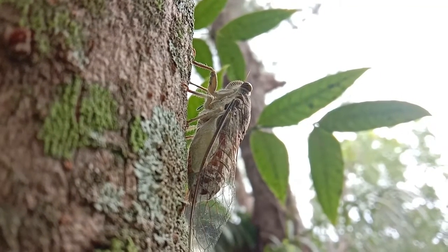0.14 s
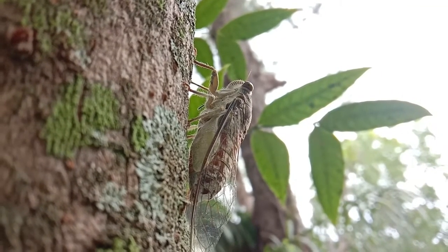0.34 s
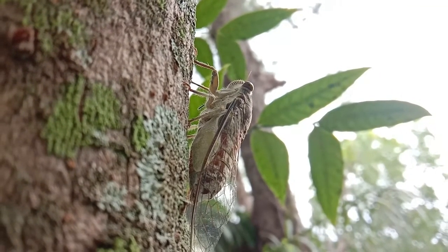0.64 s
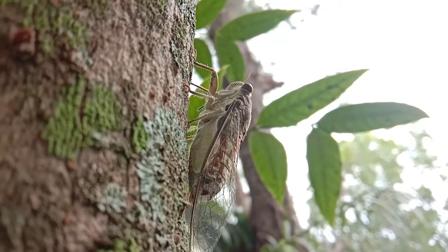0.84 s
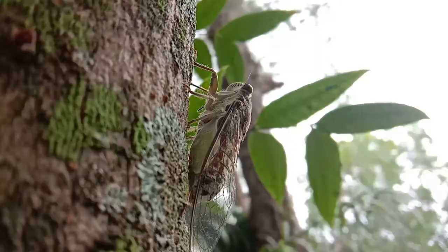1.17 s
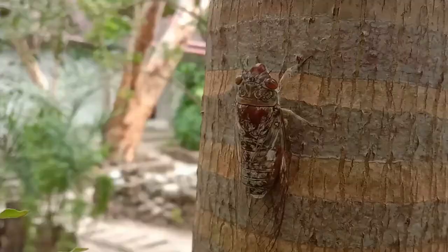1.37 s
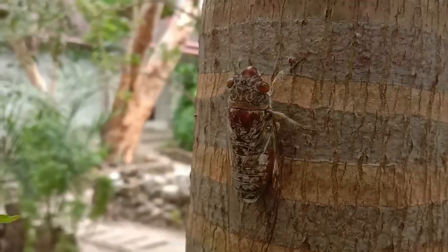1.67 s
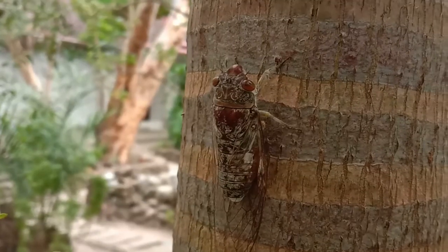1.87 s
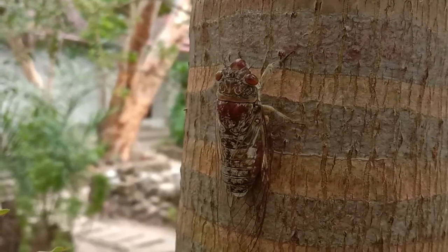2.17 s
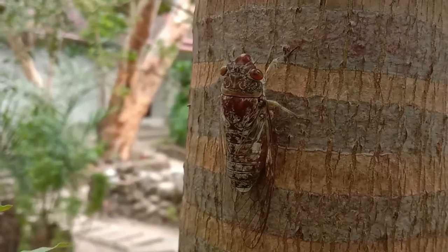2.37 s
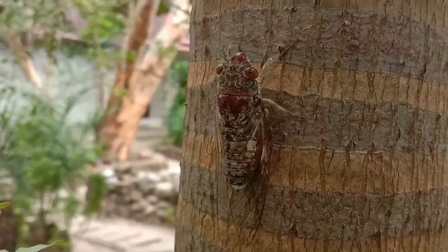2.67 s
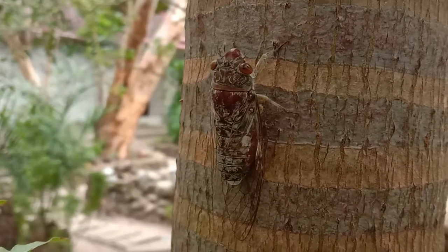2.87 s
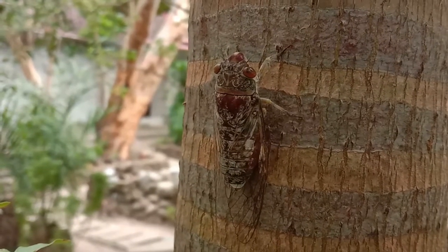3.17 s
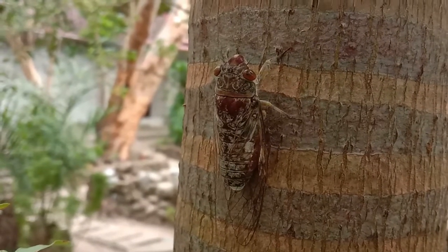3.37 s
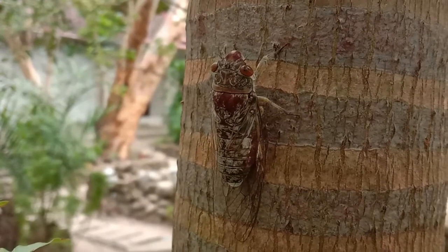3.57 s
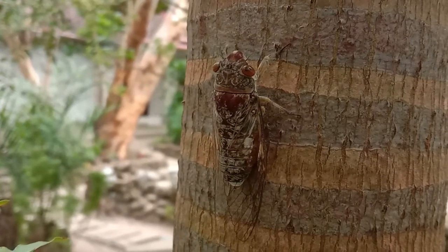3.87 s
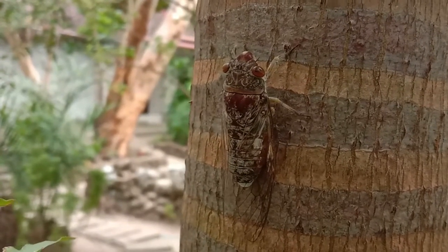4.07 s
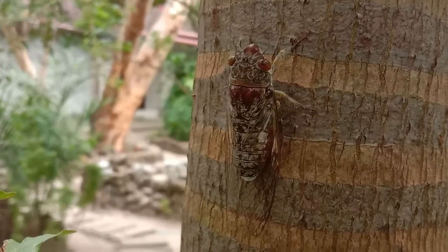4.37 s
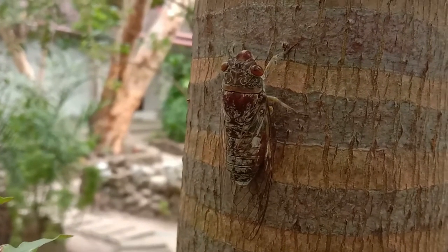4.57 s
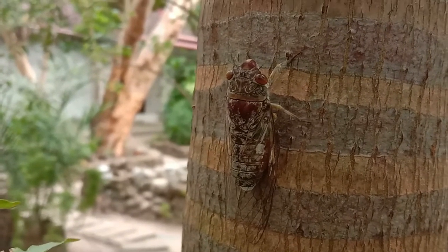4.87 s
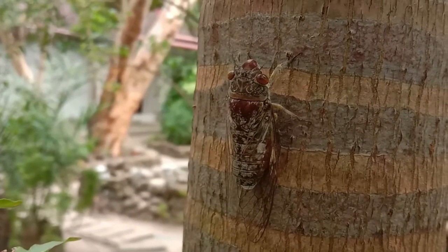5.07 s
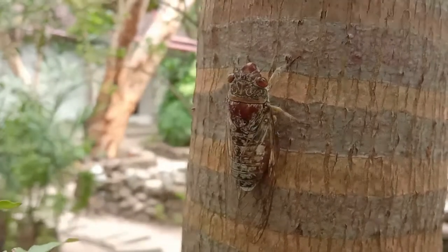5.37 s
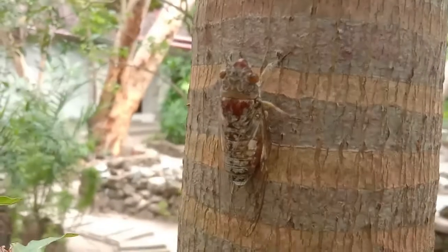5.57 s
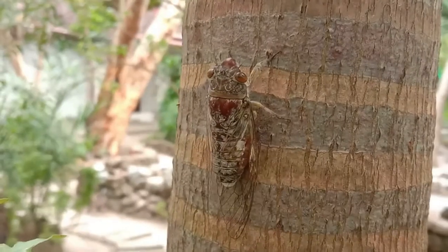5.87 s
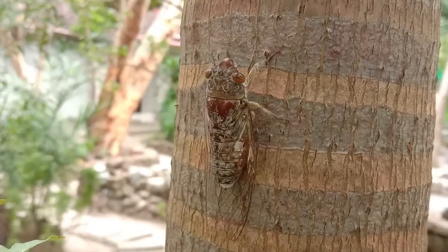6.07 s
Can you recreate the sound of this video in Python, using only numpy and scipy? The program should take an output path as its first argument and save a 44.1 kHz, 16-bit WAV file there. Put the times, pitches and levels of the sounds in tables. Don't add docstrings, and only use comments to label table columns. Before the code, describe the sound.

Harsh, dense cicada buzzing outdoors, broken by a brief silent gap, then resuming with a sharper sizzle over faint distant insect drone and chirps.

```python
import sys
import numpy as np
from scipy import signal
from scipy.fft import rfft, irfft
from scipy.io import wavfile
from scipy.ndimage import uniform_filter1d

SR = 44100
rng = np.random.default_rng(int(sys.argv[2]) if len(sys.argv) > 2 else 0)


def waveform_to_disk(signal):
    frames = np.transpose(np.atleast_2d(signal))
    scaled = np.clip(frames, -1, 1) * 32767
    samples = np.round(scaled).astype(np.int16)
    wavfile.write(sys.argv[1], SR, samples)


def magnitude_from_level(level_db):
    exponent = np.asarray(level_db, float) / 20
    return 10 ** exponent


N = 275184
TIME = np.arange(N) / SR
CUT_S = 1.3


def by_shot(first, second):
    return np.where(TIME < CUT_S, first, second)


def rms_one(x):
    return x / np.sqrt(np.mean(x ** 2) + 1e-20)


def drift(rate_hz):
    r = np.exp(-80 * np.pi * rate_hz / SR)
    settle = 2000
    noise = rng.standard_normal(N // 40 + 2 + settle)
    slow = signal.lfilter([1], [1, -2 * r, r * r], noise)[settle:]
    return np.interp(np.arange(N) / 40, np.arange(len(slow)), rms_one(slow))


def resonate(x, hz, width_hz):
    r = np.exp(-np.pi * width_hz / SR)
    b = (1 - r * r) / 2 * np.array([1, 0, -1])
    a = [1, -2 * r * np.cos(2 * np.pi * hz / SR), r * r]
    return signal.lfilter(b, a, signal.lfilter(b, a, x))


def bump(at_s, half_s):
    out = np.zeros(N)
    span = slice(max(int((at_s - half_s) * SR), 0), int((at_s + half_s) * SR) + 1)
    out[span] = np.cos(np.pi / 2 * np.clip((TIME[span] - at_s) / half_s, -1, 1)) ** 2
    return out


# (frequency [Hz], width [Hz], level [dB])
AIR_SAC = [
    [(500, 40, -27.5), (660, 170, -29), (958, 286, -15), (1750, 430, -1.5)],
    [(1408, 380, -16.5), (1749, 367, -0.5)],
]
# (frequency [Hz], width [Hz], level [dB])
TYMBAL = [
    [(2425, 690, -21), (3457, 720, 2), (4130, 730, -5)],
    [(2440, 500, -38), (3548, 713, 5), (4220, 590, -1)],
]
# (frequency [Hz], width [Hz], level [dB])
RIBS = [
    [(5300, 1600, -3), (5900, 1200, -6.5), (7070, 950, -7)],
    [(5243, 1010, -0.5), (6026, 910, -0.5), (6910, 1114, -4.5)],
]
# (frequency [Hz], width [Hz], level [dB])
RASP = [
    [(8500, 2440, -14), (11500, 6000, -7), (14600, 700, 1), (15400, 1600, 5)],
    [(8500, 2900, -5.5), (11900, 5800, -8), (14300, 450, -5), (14700, 600, 1), (15250, 800, .5)],
]
LOW_CUT_HZ = [392, 1115]


def cicada():
    # modes, clicks per second, flicker [dB], flicker rate [Hz], muscle beat [dB]
    parts = [(AIR_SAC, 24000, 0.3, 11, 0.1),
             (TYMBAL, 30000, 0.3, 12, 0.2),
             (RIBS, 32000, 0.3, 13, 0.4),
             (RASP, 24000, 0.3, 5, 1.4)]
    shots = [TIME < CUT_S, TIME >= CUT_S]
    beats = drift(300)
    out = np.zeros(N)
    for (modes, per_s, flicker_db, flicker_hz, beat_db), level_db in zip(parts, part_levels()):
        both = [body_part(shot_modes, cut_hz, shot, per_s, flicker_db, flicker_hz)
                for shot_modes, cut_hz, shot in zip(modes, LOW_CUT_HZ, shots)]
        out += magnitude_from_level(level_db + beat_db * beats) * np.concatenate(both)
    return out


def body_part(modes, cut_hz, shot, per_s, flicker_db, flicker_hz):
    together = drift(flicker_hz)[shot]
    rung = 0
    for hz, width_hz, db in modes:
        alone = drift(1.2 * flicker_hz)[shot]
        swell = magnitude_from_level(db + flicker_db * (together + 0.6 * alone))
        rung = rung + swell * resonate(clicks(len(together), per_s), hz, width_hz)
    low_cut = signal.cheby2(8, 45, 0.808 * cut_hz, "high", fs=SR, output="sos")
    return rms_one(signal.sosfilt(low_cut, rung))


def clicks(count, per_s):
    return rng.standard_normal(count) * (rng.random(count) < per_s / SR)


# (time [s], effort [dB], brightness [dB])
EFFORT = [(0, 0.5, 0.5), (.3, 0.5, -0.5), (.65, 0, 0), (.9, 0.5, 0), (1.08, -.5, 0.5), (1.17, 2, 0),
          (1.5, -1, -0.5), (1.95, 0, 0), (2.45, -0.5, -1), (3.0, 0.5, -.5), (3.5, 0, -.5), (3.9, 0, 0.5),
          (4.15, -.5, 0.5), (4.7, 0.5, 0.5), (5.3, 0, 1.5), (5.7, .5, .5), (6.05, 0, 0), (6.24, .5, 1.5)]
# (first shot [dB], second shot [dB], share of brightness [ratio], throb [dB])
PARTS = [
    (-34.5, -37, 0.0, -0.14),
    (-25, -23, -0.94, -0.64),
    (-22.5, -18.5, .45, 0.45),
    (-35.5, -36, 1.1, 2.5),
]
# (time [s], level [dB])
SLACKS = [
    (4.08, -2.5),
    (4.3, -3.5),
    (4.53, -2.5),
    (4.76, -4),
    (5.0, -1.5),
    (5.81, -2.5),
    (5.98, -2),
]


def part_levels():
    s, effort, bright = np.transpose(EFFORT)
    effort_db, bright_db = np.interp(TIME, s, effort), np.interp(TIME, s, bright)
    pumping = throb()
    levels = [by_shot(first_db, second_db) + effort_db + share * bright_db + throb_db * pumping
              for first_db, second_db, share, throb_db in PARTS]
    tymbal = 1
    levels[tymbal] = levels[tymbal] + sum(db * bump(s, half_s=0.053) for s, db in SLACKS)
    return levels


# (time [s], strength [ratio])
PUMPS = [(.06, 0.56), (.25, 0.85), (.43, 1.1), (.62, 1.2), (.8, 1.3), (.96, .5), (1.1, 0.55), (1.94, 0.84),
         (2.07, 0.54), (2.21, 0.69), (2.45, .5), (2.62, 0.65), (2.78, 0.55), (3.08, 0.56), (3.26, 0.65),
         (3.55, 1.1), (3.83, .8), (4.06, 1.4), (4.22, 0.61), (4.39, .8), (4.55, 1.4), (4.74, 0.98),
         (4.97, 1.2), (5.19, 1), (5.38, 0.56), (5.62, 0.92), (5.81, .8), (5.98, 1.8), (6.19, .8)]


def throb():
    return sum(strength * bump(s, half_s=0.058) for s, strength in PUMPS)


# (time [s], half length [s], level [dB])
DRONE_SWELLS = [(0.694, 0.031, -52), (1.64, 0.069, -49), (1.793, 0.23, -50), (2.716, 0.057, -61),
                (2.992, 0.073, -57), (3.363, 0.35, -55.5), (4.11, 0.45, -51.5), (4.604, 0.8, -57),
                (5.247, 0.26, -54.5), (5.716, 0.27, -58), (6.054, .3, -60)]


def far_drone():
    level = magnitude_from_level(by_shot(-46, -63) - 0.3 * drift(2.9))
    level = level + sum(magnitude_from_level(db) * bump(s, half_s) for s, half_s, db in DRONE_SWELLS)
    return level * rms_one(resonate(rng.standard_normal(N), hz=1245, width_hz=70))


# (frequency [Hz], level [dB per Hz])
WOOD_COLOUR = [(15, -51), (25, -25), (32, -2.5), (107, 1.5), (269, -6.5), (446, -6.5), (642, -7.5),
               (954, -4.5), (1100, -16), (1430, -35), (2420, -120)]


def wood():
    hz = np.arange(N // 2 + 1) * SR / N + 1
    table_hz, table_db = np.transpose(WOOD_COLOUR)
    colour = magnitude_from_level(np.interp(np.log(hz), np.log(table_hz), table_db))
    rumble = irfft(rfft(rng.standard_normal(N)) * colour, N)
    lumpy = rumble * magnitude_from_level(1.1 * drift(16))
    gusts_db = 0.4 * drift(3.3)
    return magnitude_from_level(by_shot(-68, -70.5) + gusts_db) * rms_one(lumpy)


# (time [s], frequency [Hz],
# width [Hz], half length [s], level [dB])
CHIRPS = [(0.777, 79.6, 30, 0.17, -70), (1.97, 230, 80, .04, -69.5), (3.914, 110, 80, 0.076, -66),
          (4.366, 140, 120, .04, -69), (4.46, 180, 150, .03, -67), (4.578, 130, 120, 0.042, -62),
          (6.008, 120, 120, .06, -65), (2.38, 1010, 80, .04, -70), (1.978, 1100, 150, 0.12, -57),
          (3.92, 477, 60, 0.046, -64), (4.0, 440, 60, .06, -70), (4.057, 840, 200, 0.055, -66),
          (4.343, 1050, 120, 0.058, -60), (4.714, 400, 300, .06, -71), (5.283, 1104, 150, 0.053, -56),
          (5.294, 750, 200, 0.046, -67), (5.82, 450, 300, 0.036, -72), (5.983, 500, 500, .04, -67),
          (0.001, 356, 900, 0.0055, -42), (6.239, 300, 900, 0.0033, -41)]


def far_chirps():
    noise = rng.standard_normal(N)
    return sum(magnitude_from_level(db) * bump(s, half_s) * rms_one(resonate(noise, hz, width_hz))
               for s, hz, width_hz, half_s, db in CHIRPS)


def scene():
    return np.tile(cicada() + far_drone() + wood() + far_chirps(), (2, 1))


def suppress(x, contrast, mute, size):
    hz, s, cells = signal.stft(x, SR, nperseg=size, noverlap=size // 2, window="cosine", boundary="even")
    height = np.abs(cells) + 1e-12
    around = uniform_filter1d(uniform_filter1d(height, size=9, axis=0), size=5, axis=1)
    relief = height / around
    patch = uniform_filter1d(uniform_filter1d(relief, size=3, axis=0), size=3, axis=1)
    under_buzz = ((hz > 450) & (hz < 1190)) * np.clip(hz / 1050, 0, 1) ** 1.2
    masked = under_buzz[:, None] * (s > CUT_S)
    gain = relief ** contrast * np.where(patch < mute * masked, magnitude_from_level(-30), 1)
    return signal.istft(cells * gain, nperseg=size, noverlap=size // 2, window="cosine")[1][:N]


THIN_MOMENTS = (.689, 1.67, 2.823, 2.928, 3.014, 3.292, 4.315, 4.508, 5.765)


def thin_out(x, count):
    out = x.copy()
    half_s, rest_db = 0.016, -15
    for s in THIN_MOMENTS:
        span = slice(round((s - half_s) * SR), round((s + half_s) * SR))
        lines = rfft(x[span])
        hz = np.arange(len(lines)) * SR / len(x[span])
        rank = np.abs(lines) * magnitude_from_level(10 * (hz > 14400) + 7.5 * (hz < 2000))
        strongest = rank >= np.sort(rank)[-count]
        kept = irfft(lines * strongest, len(x[span]))
        out[span] += bump(s, half_s)[span] * (magnitude_from_level(2.0) * kept - (1 - magnitude_from_level(rest_db)) * x[span])
    return out


# (low [Hz], high [Hz], lines kept [count], from time [s])
STALL_BANDS = [
    (1700, 1790, 1, .615),
    (3050, 3800, 4, 0),
    (4980, 5850, 5, 0),
    (6050, 6350, 1, 0),
    (6830, 7230, 1, 0),
    (14900, 15500, 3, 0),
]


def stall(x):
    start_s, end_s, step_s = 0.582, 0.648, 0.0215
    to_edge_s = np.minimum(TIME - start_s + 0.013, end_s + 0.013 - TIME)
    inside = np.sin(np.pi / 2 * np.clip(to_edge_s / 0.017, 0, 1)) ** 2
    out = (1 - inside) * x
    for middle_s in start_s + step_s * np.arange(4):
        window = bump(middle_s, step_s)
        near = window > 0
        height = 2 * np.abs(rfft((x * window)[near])) / window.sum()
        hz = np.arange(len(height)) * SR / near.sum()
        peaks = signal.find_peaks(height, distance=4)[0]
        for low_hz, high_hz, count, since_s in STALL_BANDS:
            inband = peaks[(hz[peaks] > low_hz) & (hz[peaks] < high_hz) & (middle_s > since_s)]
            kept = inband[np.argsort(height[inband])[-count:]]
            turns = np.outer(hz[kept], TIME[near]) + rng.random((count, 1))[:len(kept)]
            tones = height[kept] @ np.sin(2 * np.pi * turns)
            out[near] += magnitude_from_level(4.5) * tones * window[near] ** 0.42
    return out


def edit():
    out_s, tail_s, entry_s, rise_s = 1.1953, 0.021, 1.42, 0.049
    closing = np.cos(np.pi / 2 * np.clip((TIME - out_s) / tail_s, 0, 1)) ** 0.76
    tail = magnitude_from_level(-20.5) * closing * (TIME < out_s + tail_s)
    entry = np.sin(np.pi / 2 * np.clip((TIME - entry_s) / rise_s, 0, 1)) ** 6.3
    fade = np.clip((TIME - 1.407) / 0.3, 0, 1)
    gain = np.where(TIME < out_s, 1, tail + entry * fade)
    return magnitude_from_level(1.43) * uniform_filter1d(gain, size=60)


# (time [s], low [Hz], high [Hz], level [dB])
SPLITS = [
    (1.972, 400, 700, -84),
    (.948, 7400, 9900, -39.5),
    (1.574, 6800, 7600, -36),
    (3.92, 4800, 6200, -21),
    (3.919, 9600, 11900, -44),
    (4.176, 4600, 5900, -22),
    (4.176, 13000, 14600, -48),
    (4.571, 10800, 12600, -47),
]


def split_bands():
    white = rfft(rng.standard_normal(N))
    hz = np.arange(N // 2 + 1) * SR / N
    return sum(magnitude_from_level(db) * bump(s, 1024 / SR) * rms_one(irfft(white * (hz > low_hz) * (hz < high_hz), N))
               for s, low_hz, high_hz, db in SPLITS)


def low_pass(x):
    return signal.sosfilt(signal.butter(12, 16820, fs=SR, output="sos"), x)


def record(dry):
    mono = magnitude_from_level(-1.5) * suppress(dry[0], contrast=0.15, mute=0.77, size=2048)
    mono = stall(thin_out(mono, count=17))
    band_limit = signal.ellip(18, 0.3, 120, 15480, fs=SR, output="sos")
    mono = signal.sosfilt(band_limit, mono * edit())
    mix = mono + split_bands() * [[1], [-1]]
    return low_pass(mix)


dry = scene()
out = record(dry)
waveform_to_disk(out)
```